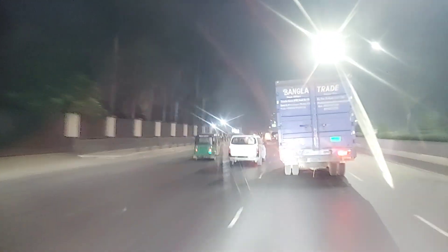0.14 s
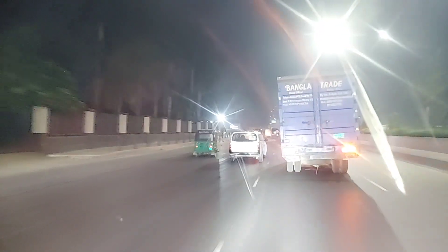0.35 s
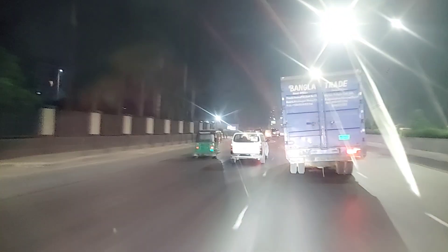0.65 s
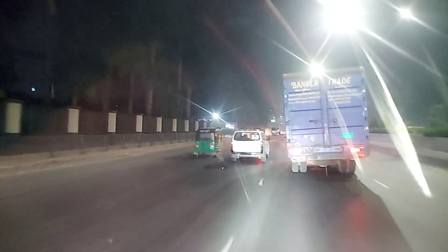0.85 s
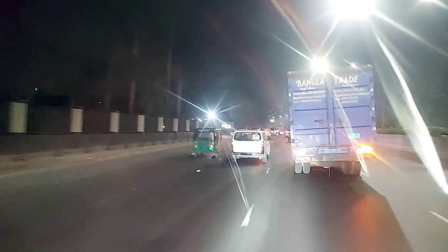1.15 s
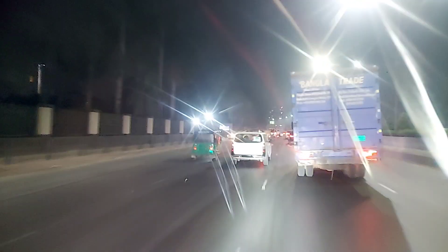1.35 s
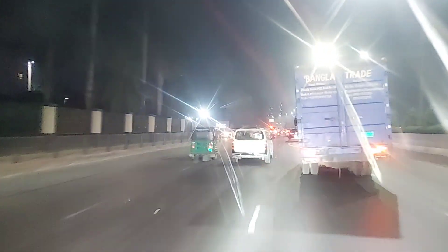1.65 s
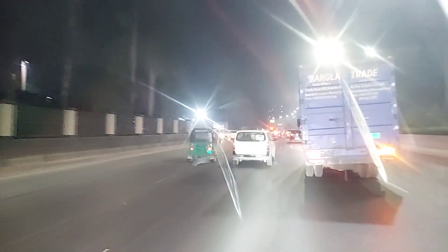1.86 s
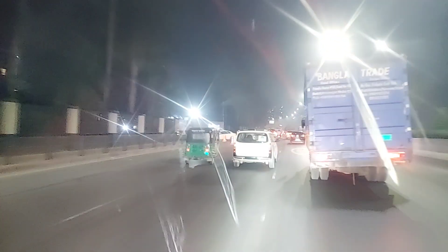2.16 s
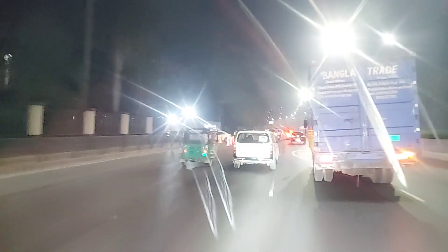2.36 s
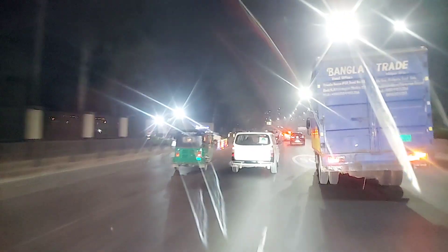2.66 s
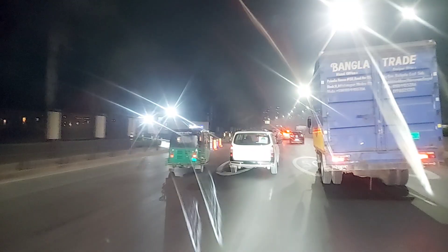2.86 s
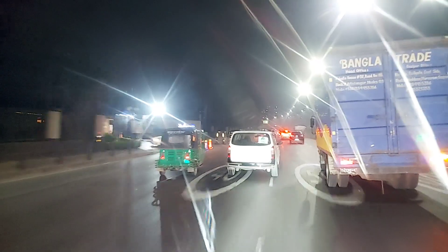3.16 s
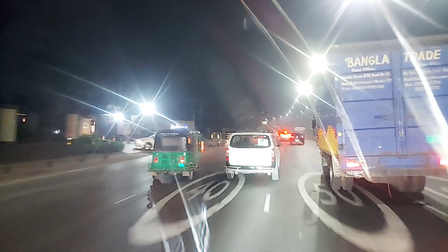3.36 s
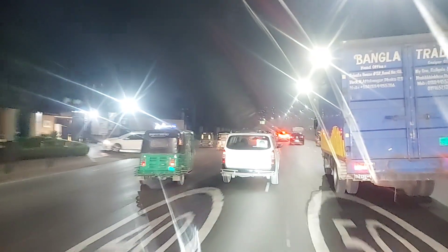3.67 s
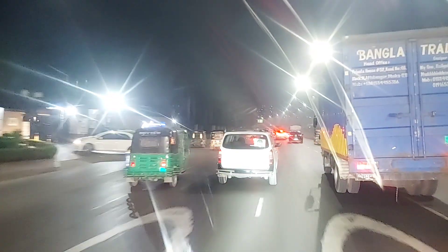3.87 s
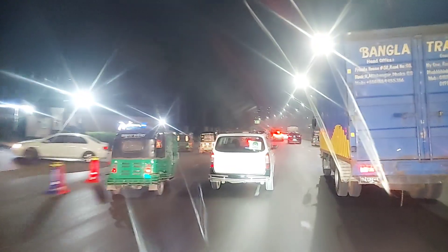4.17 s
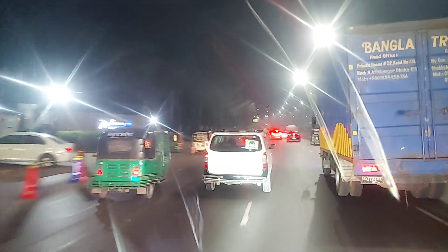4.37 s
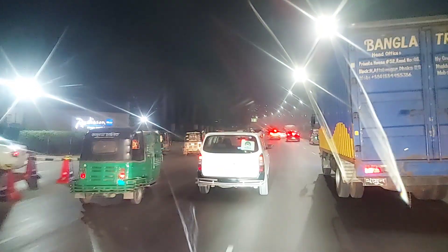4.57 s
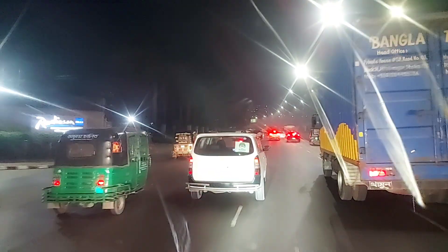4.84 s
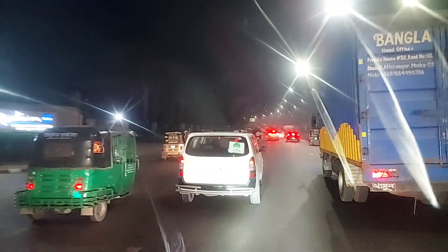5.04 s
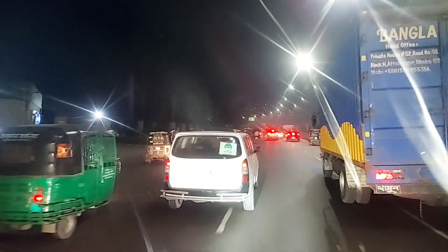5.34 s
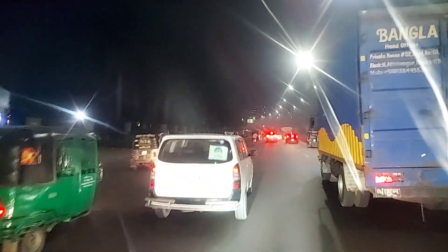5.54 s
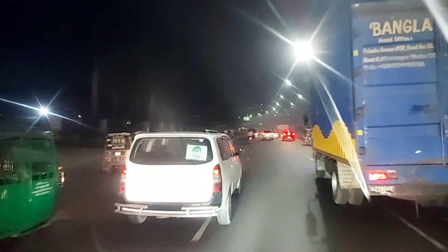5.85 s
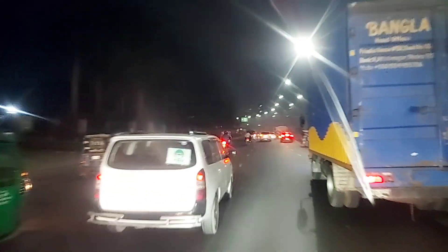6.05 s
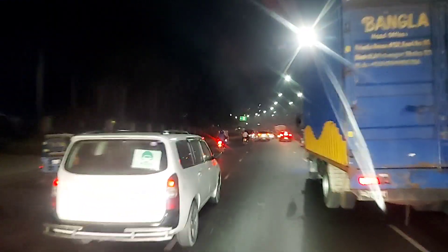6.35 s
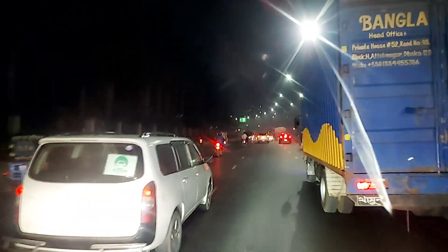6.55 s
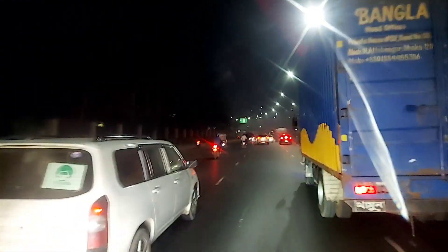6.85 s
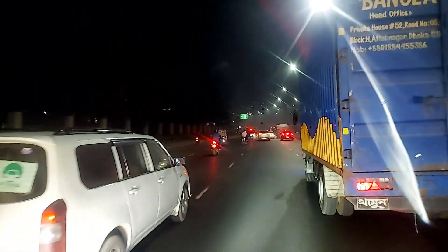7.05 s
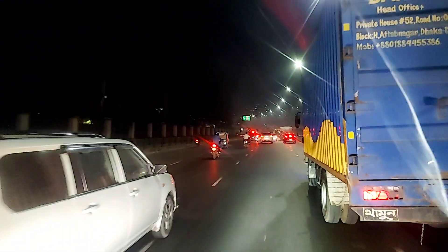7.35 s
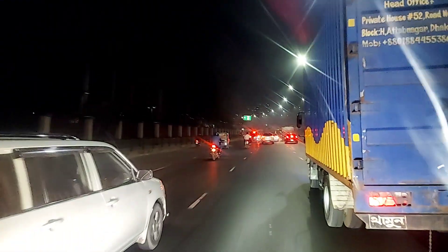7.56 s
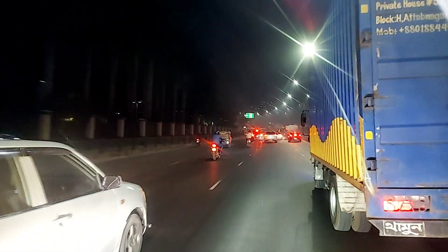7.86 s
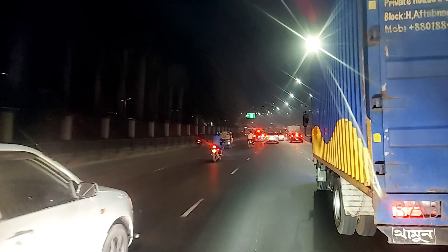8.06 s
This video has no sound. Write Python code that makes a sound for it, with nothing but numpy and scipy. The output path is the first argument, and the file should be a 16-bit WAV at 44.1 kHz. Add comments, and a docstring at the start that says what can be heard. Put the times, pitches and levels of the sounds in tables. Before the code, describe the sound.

The microphone is inside the cab of a moving truck. A low engine drone, booming road rumble and tyre roar continue for the whole eight seconds. From the start until about 2.8 seconds, a loose part clacks sharply and irregularly on the right, with a few faint dull scuffs. The engine adds a soft whine under load from 0.7 to 2.7 seconds. At 4.3 seconds a loud, bright two-tone electric horn gives a short blast, followed by a longer one from 4.7 to 5.7 seconds. The clacking returns between 5.6 and 6.9 seconds, and bumps thump through the floor at about 5.7 and 7.1 seconds. An overtaken car's low exhaust hum swells near 6.9 seconds, and its tyre noise rises and fades around 7.8 seconds. A third horn blast holds from 7.3 to 8.1 seconds over the continuing rumble.

```python
"""Horn blasts from a truck cab

A truck rolls along a busy road: the engine drones at its firing rate, the road and the drive shaft
excite the cab's resonances, and the tyres roar. A loose part clacks by the right microphone as the
cab shakes, bumps thump through the floor, and a car is overtaken on the left. The two diaphragms of
an electric horn, about a major third apart, sound three long blasts."""
import sys
import numpy as np
from scipy import signal
from scipy.fft import rfft, irfft, next_fast_len
from scipy.io import wavfile
from scipy.ndimage import uniform_filter1d, map_coordinates

SR = 44100
rng = np.random.default_rng(int(sys.argv[2]) if len(sys.argv) > 2 else 0)


def master_out(mix):
    """Clip the mix to full scale and print it as 16-bit PCM to the path in sys.argv[1]."""
    frames = np.transpose(np.atleast_2d(mix))
    ceiling = np.clip(frames, -1, 1)
    pcm = np.round(ceiling * 32767).astype(np.int16)
    wavfile.write(sys.argv[1], SR, pcm)


N = 362061
TIME = np.arange(N) / SR

# spectrum of tyre roar: frequency_hz, density_db
TYRE_SPECTRUM = [(200, -13.5), (450, 4), (620, -2), (800, -1.5), (1050, -2), (1500, -7), (2200, -14.5),
                 (3100, -16.5), (4500, -29), (6000, -33), (12000, -52)]
# spectrum of rushing air: frequency_hz, density_db
AIR_SPECTRUM = [(1500, -50), (3200, -1.5), (4500, -1.5), (6000, -8.5), (7500, -5.5), (9500, -11),
                (13000, -14), (15500, -18)]


def amp(db):
    """Decibels to amplitude ratio."""
    return 10 ** (np.asarray(db) / 20)


def unit(x):
    """Normalisation to rms 1."""
    return x / np.sqrt(np.mean(x ** 2) + 1e-20)


def along(points, hz):
    """Interpolation of (frequency_hz, value) points on a logarithmic frequency axis."""
    f, v = np.transpose(points)
    return np.interp(np.log(hz + 1), np.log(f + 1), v)


def curves(rows):
    """Linear interpolation, to every sample, of each column after the time."""
    s, *cols = np.transpose(rows)
    return [np.interp(TIME, s, c) for c in cols]


def wobble(rate, size=N):
    """Smooth random modulation: a spline through rate knots a second."""
    coarse = TIME[:size:64]
    knots = rng.standard_normal(int(coarse[-1] * rate) + 4)
    return np.interp(TIME[:size], coarse, map_coordinates(knots, [coarse * rate]))


def filtered(x, response):
    """Linear filtering: the spectrum times a complex frequency response."""
    m = next_fast_len(N + SR // 2)
    return irfft(rfft(x, m) * response(np.fft.rfftfreq(m, 1 / SR)), m)[..., :N]


def add(track, start_s, sound):
    """Superposition of a sound on a track."""
    part = track[..., max(round(start_s * SR), 0):][..., :sound.shape[-1]]
    part += sound[..., :part.shape[-1]]


def rush(spectrum, patchy_db, left_lead_ms=0.42):
    """Partly coherent stereo noise of rms 1, its gain varying in patches of time and frequency."""
    # likeness of left and right: frequency_hz, coherence
    likeness = [(60, 0.97), (130, 0.9), (290, 0.84), (640, 0.81), (1400, 0.42), (3000, 0.083), (6000, .05)]
    cells = signal.stft(rng.standard_normal((2, N)), nperseg=512)[2]
    patches = uniform_filter1d(rng.standard_normal(cells.shape[1:]), size=5, axis=0)
    patches = unit(uniform_filter1d(patches, size=12, axis=1))
    pair = signal.istft(cells * amp(patchy_db * patches), nperseg=512)[1][:, :N]
    turn = lambda hz: np.arccos(np.clip(along(likeness, hz), -1, 1)) / 2
    mid, side = filtered(pair, lambda hz: amp(along(spectrum, hz)) * [np.cos(turn(hz)), np.sin(turn(hz))])
    # the lead shrinks below 900 Hz
    lead = lambda hz: np.exp(2j * np.pi * hz * left_lead_ms / 1000 * np.minimum(hz / 900, 1))
    return unit(np.array([filtered(mid + side, lead), mid - side]))


def echoes(x, t60_s):
    """Diffuse reverberation: convolution with decaying noise, independent on each side."""
    t = TIME[:SR // 2]
    tail = rng.standard_normal((2, len(t))) * amp(-60 * t / t60_s) * (1 - np.exp(-t / 0.0013))
    return signal.fftconvolve(np.atleast_2d(x), tail / np.linalg.norm(tail[0]), axes=1)[:, :N]


def drone(hz, gain, overtones_db=(), flutter_db=1.5, drift_rad=0.1):
    """A hum and its harmonics under random amplitude and phase modulation."""
    phase = 2 * np.pi * np.cumsum(hz) / SR
    hum = amp(flutter_db * wobble(8.3)) * np.sin(phase + drift_rad * wobble(11))
    for order, order_db in enumerate(overtones_db, start=2):
        hum += amp(order_db + 2.3 * wobble(4)) * np.sin(order * phase + .5 * wobble(8))
    return np.sqrt(2) * gain * hum


def passing(abreast_s, half_power_s):
    """Spherical spreading: the amplitude of a passing source falls inversely with distance."""
    return 1 / np.hypot(1, (TIME - abreast_s) / half_power_s)


def road(boom_db=-23, tyre_db=-32.5, air_db=-52.5):
    """Random forcing: a rougher road shakes the cab harder, while tyres roar and air hisses outside."""
    # roughness of the surface: time_s, level_db
    surface = [(0, -25), (1.2, -23), (2.8, -22.5), (4.1, -23), (5.1, -28.5), (5.8, -23.5), (6.5, -28.5),
               (7.4, -24), (8.21, -28.5)]
    # boom of the cab: frequency_hz, density_db
    boom_spectrum = [(15, -50), (25, -46), (33, -14), (40, -15), (50, -10), (57, -3), (64, -10.5),
                     (80, -14.5), (110, -25), (300, -100)]
    # rumble of the road: frequency_hz, density_db
    rumble_spectrum = [(50, -55), (85, -7), (140, 1.5), (190, -2.5), (260, -2.5), (330, -5.5), (420, -6),
                       (550, -12.5), (750, -17), (1500, -42), (4000, -100)]
    rough_db, = curves(surface)
    boom = amp(boom_db + 0.66 * (rough_db - rough_db.mean())) * rush(boom_spectrum, patchy_db=-1.0)
    rumble = amp(rough_db) * rush(rumble_spectrum, patchy_db=1.0)
    tyres = amp(tyre_db + 0.66 * wobble(14)) * rush(TYRE_SPECTRUM, patchy_db=1.03)
    air = rush(AIR_SPECTRUM, patchy_db=.6) * amp(air_db + 0.5 * wobble(8.7))
    return boom + rumble + tyres + air


def shaft(cab_hz=55.8, bandwidth_hz=3.2, peak_db=-22.5):
    """Forced resonance: the drive shaft hums loudest as its rate nears the cab's natural frequency."""
    # shaft rotation, set by road speed: time_s, rate_hz
    rotation = [(0, 47.6), (2.4, 49.65), (4.3, 54.13), (4.9, 54.9), (6.2, 54.37), (6.65, 52.55),
                (8.21, 52.4)]
    hz, = curves(rotation)
    return drone(hz, amp(peak_db) / np.hypot(1, 2 * (hz - cab_hz) / bandwidth_hz), flutter_db=2)


def engine(whine_order=3.5, turbo_db=-33, rise_s=0.12, fall_s=0.058):
    """Periodic firing makes a harmonic drone; under load a higher order whines and the turbo hisses."""
    # engine drone: time_s, firing_hz, level_db
    firing = [(0, 61.73, -18.5), (.7, 63.92, -19), (1.7, 67.25, -17.5), (2.65, 69, -23.5),
              (3.0, 68.23, -16.5), (4.2, 67.1, -18.5), (4.7, 66.67, -23.5), (5.6, 65.48, -21.5),
              (6.15, 66.97, -31), (7.0, 67, -23), (8.21, 65.6, -20.5)]
    # accelerator: pressed_s, released_s, whine_db
    throttle = [(0.69, 2.697, -29), (6.094, 6.9, -34)]
    # turbocharger hiss: frequency_hz, density_db
    turbo_spectrum = [(9000, -30), (13000, -3), (15000, 0)]
    hz, db = curves(firing)
    motor = drone(hz, amp(db), overtones_db=[-21, -15, -20]) * amp([[.25], [-.25]])
    load = np.zeros(N)
    for on, off, whine_db in throttle:
        rise = 1 - np.exp(-np.maximum(TIME - on, 0) / rise_s)
        load += amp(whine_db) * rise * np.exp(-np.maximum(TIME - off, 0) / fall_s)
    whine = drone(whine_order * hz, load, drift_rad=0.13)
    return motor + whine + amp(turbo_db) * load * rush(turbo_spectrum, patchy_db=.6)


def car(exhaust_hz=111.7, exhaust_db=-29, tyre_db=-28.5, air_db=-47):
    """An overtaken car swells and fades by the inverse-square law: first its exhaust, then its tyres."""
    exhaust_gain = amp(exhaust_db) * passing(abreast_s=6.92, half_power_s=0.23)
    exhaust = drone(np.full(N, exhaust_hz), exhaust_gain, flutter_db=3.0, drift_rad=0.2)
    tyres = amp(tyre_db) * rush(TYRE_SPECTRUM, patchy_db=1.8)
    air = amp(air_db) * rush(AIR_SPECTRUM, patchy_db=.6)
    return exhaust + passing(abreast_s=7.77, half_power_s=0.25) * (tyres + air)


def rustles():
    """Faint airy noise swells under Gaussian envelopes."""
    # swells: centre_s, level_db, half_length_s
    puffs = [(3.07, -44.5, .05), (5.029, -46, 0.061)]
    # their colour: frequency_hz, density_db
    puff_spectrum = [(2000, -17), (3400, 11), (5000, -2), (7500, 3), (10000, -11), (14500, -10)]
    swell = sum(amp(db) * np.exp(-((TIME - s) / half) ** 2) for s, db, half in puffs)
    return swell * rush(puff_spectrum, patchy_db=2)


def jolts(scuff_db=-9, scuff_t60_s=0.15):
    """Impulse response: bumps ring the floor, soft ones only in its low modes, and loose trim scuffs."""
    # road bumps: start_s, level_db, cutoff_hz
    bumps = [(5.672, -4.5, 250), (7.136, -2, 65)]
    # modes of the cab floor: frequency_hz, level_db, t60_s
    floor_modes = [(60, -7, 0.083), (74.4, -7, 0.063), (117, 5, .057), (142, -21, .11)]
    # dull scuffs: start_s, level_db
    scuffs = [(0.993, -24), (2.078, -24), (2.984, -22), (4.263, -21), (6.094, -26), (6.558, -23),
              (6.876, -23)]
    # their colour: frequency_hz, density_db
    scuff_spectrum = [(300, -30), (800, -3), (1250, 0), (1800, -9), (4000, -18), (9000, -45)]
    thumps, rubbing, t = np.zeros(N), np.zeros(N), TIME[:SR // 3]
    for s, db, cutoff_hz in bumps:
        ring = sum(amp(mode_db - 60 * t / t60) * np.sin(2 * np.pi * hz * t)
                   / np.hypot(1, (hz / cutoff_hz) ** 5) for hz, mode_db, t60 in floor_modes)
        add(thumps, s, amp(db) * (1 - np.exp(-t / 0.0009)) * ring)
    for s, db in scuffs:
        add(rubbing, s, amp(db + scuff_db - 60 * t / scuff_t60_s) * (1 - np.exp(-t / 0.001)))
    return thumps + rubbing * rush(scuff_spectrum, patchy_db=2)


def clacks(level_db=-1.5, rebound_db=-17, crack_db=-3, crack_t60_s=0.0026, left_delay_s=.00036):
    """Impact excites damped modes: a loose part on the right cracks, rings briefly and rebounds."""
    # blows: start_s, level_db
    blows = [(0.138, -11), (0.213, -16), (0.29, -11), (0.672, -10), (0.721, -9), (0.959, -6),
             (1.084, -14.5), (1.135, -16), (1.319, -6), (1.416, -10), (1.474, -4.5), (1.832, -8),
             (1.857, -17), (2.123, -6.5), (2.375, -16), (2.414, -9.5), (2.759, -6.5), (2.772, -17),
             (5.609, -7.5), (5.708, -5.5), (5.763, -10), (5.821, -10.5), (5.895, -5.5), (5.983, -6),
             (6.061, -7), (6.299, -11.5), (6.357, -9.5), (6.589, -6), (6.827, -6), (6.904, -5.5),
             (6.92, -16)]
    # modes of the part: frequency_hz, level_db, t60_s
    part_modes = [(527, 5, 0.022), (797, 6, 0.011), (1000, 5, 0.013), (1410, -2.5, .012),
                  (1890, -3, 0.0093), (2213, -9.5, 0.016), (3290, -7, 0.011), (4130, -8.5, 0.0096),
                  (4745, -11, 0.012), (7300, -14.5, 0.0088), (9010, -20.5, 0.012), (10360, -25, 0.0097),
                  (11700, -28, 0.013)]
    right, t = np.zeros(N), TIME[:SR // 20]
    hz, mode_db, t60 = np.transpose(part_modes)[:, :, None]
    sign = (-1) ** np.arange(len(part_modes))[:, None]
    median_db = np.median(np.array(blows)[:, 1])
    soften = signal.butter(3, 9000, fs=SR)
    for s, db in blows:
        tilt_db = 0.15 * (db - median_db) * np.minimum(hz / 3500, 1)  # harder blows are brighter
        decays = sign * amp(mode_db + tilt_db + rng.normal(0, 1.3, hz.shape) - 60 * t / t60)
        ring = (decays * np.sin(2 * np.pi * hz * t * rng.normal(1, 0.02, hz.shape))).sum(axis=0)
        crack = signal.lfilter(*soften, rng.standard_normal(len(t)))
        clack = amp(db + level_db) * (ring + amp(crack_db - 60 * t / crack_t60_s) * crack)
        add(right, s, clack)
        add(right, s + rng.uniform(.004, .008), amp(rebound_db + rng.normal(0, 1.9)) * clack)
    left = amp(-17) * filtered(right, lambda f: np.exp(-2j * np.pi * f * left_delay_s))
    cab = amp([[-18], [-13]]) * echoes(right, t60_s=0.07)
    return np.array([left, right]) + cab


def diaphragm(hz, partials, cycles, gate, waver_db, treble_db):
    """A driven diaphragm radiates a harmonic series whose overtones come last and die first."""
    # phase by which left leads right: frequency_hz, lead_rad
    phase_lead = [(0, -11), (520, 1.02), (1030, 2.5), (1290, 0.5), (1640, -2.5), (2070, -4), (2330, -7.5),
                  (3190, -9), (7150, -21.5), (8790, -14), (10500, -26), (12100, -36.5), (15800, -23.2),
                  (16500, -23.8)]
    out = np.zeros((2, len(gate)))
    for order, left_db, right_db in partials:
        k = round(order)
        swell = gate ** (.5 + k * hz / 1500)
        swell *= amp(treble_db * along([(2000, 0.038), (2800, 0.87)], k * hz))
        lead = along(phase_lead, k * hz) / 2
        # reflections from passing traffic make each partial waver, the high ones more
        depth_db = waver_db * np.clip((k * hz / 2100) ** 2, .4, 2.2)
        for side, db, shift in (0, left_db, lead), (1, right_db, -lead):
            waver = .4 * wobble(5, len(gate)) + wobble(26, len(gate))
            out[side] += swell * amp(db + depth_db * waver) * np.sin(2 * np.pi * k * cycles + shift)
    return np.sqrt(2) * out


def horn(low_hz=397.65, attack_s=0.0082, release_s=0.03, rasp_db=-43, street_db=-21):
    """Beating: two horns just over a major third apart interfere in their partials near 2 kHz."""
    # horn button: pressed_s, released_s, level_db, beat_hz, waver_db, treble_db
    blasts = [(4.317, 4.617, 1.5, 2.76, 1.6, 0.5), (4.732, 5.693, 0, 3.847, 1.35, 0.5),
              (7.305, 8.132, 0, 3.44, 2.36, 1.5)]
    # partials of the low horn: harmonic, left_db, right_db
    low_partials = [(1, -25, -22), (2, -26.5, -23), (3, -29, -22.5), (4, -30, -33.5), (5, -26, -44),
                    (6, -35, -42.5), (7, -40.5, -41), (8, -47, -52), (9, -50.5, -51), (10, -63, -71)]
    # partials of the high horn: harmonic, left_db, right_db
    high_partials = [(1, -29.5, -23), (2, -21, -25), (3, -38.5, -28.5), (4, -30.5, -38), (5, -51, -66),
                     (6, -65, -66), (7, -68, -68)]
    # envelope of the low horn's thin top partials: frequency_hz, level_db
    top = [(4400, -71), (5600, -67), (6500, -73), (7500, -69), (8400, -74), (9200, -76)]
    # noise of the contact breaker: frequency_hz, density_db
    rasp_spectrum = [(500, -40), (1000, -5), (2000, 5), (3200, 7.5), (4200, -28), (8000, -39)]
    buzz = [(k, along(top, k * low_hz), along(top, k * low_hz) - 3) for k in range(12, 24)]
    tone, sounding, t = np.zeros((2, N)), np.zeros(N), TIME[:SR * 3 // 2]
    for on, off, db, beat_hz, waver_db, treble_db in blasts:
        gate = (1 - np.exp(-t / attack_s)) * np.exp(-np.maximum(t - (off - on), 0) / release_s)
        # one supply feeds both horns: they jitter together and flick upward when the current stops
        jitter = .0005 * wobble(25, len(t)) + .0008 * wobble(160, len(t))
        run_down = np.maximum.accumulate(gate) - gate
        clock = np.cumsum(1 + .016 * run_down + jitter) / SR
        high_hz = (5 * low_hz + beat_hz) / 4
        for hz, partials in (low_hz, low_partials + buzz), (high_hz, high_partials):
            add(tone, on, amp(db) * diaphragm(hz, partials, hz * clock, gate, waver_db, treble_db))
        add(sounding, on, gate)
    rasp = amp(rasp_db) * sounding * rush(rasp_spectrum, patchy_db=1)
    return tone + rasp + amp(street_db) * echoes(tone, t60_s=0.19)


def scene():
    """Superposition of all the sources heard in the cab."""
    return engine() + shaft() + road() + car() + horn() + clacks() + jolts() + rustles()


def record(dry, low_cut_hz=38, top_hz=15900):
    """Microphone response: a low cut, a treble notch on the right, soft saturation and a band limit."""
    # response of the right microphone: frequency_hz, gain_db
    right_response = [(4500, 0), (5600, -3.5), (6500, -12), (8300, -17), (9400, 0), (12500, 0.5),
                      (14500, 10)]
    low_cut = lambda hz: hz ** 4 / np.hypot(hz ** 4, low_cut_hz ** 4)
    colour = lambda hz: np.array([np.ones_like(hz), amp(along(right_response, hz))])
    coloured = filtered(dry, lambda hz: low_cut(hz) * colour(hz))
    rounded = coloured / (1 + np.abs(coloured) ** 8) ** (1 / 8)
    return filtered(rounded, lambda hz: hz < top_hz)


dry = scene()
out = record(dry)
master_out(out)
```